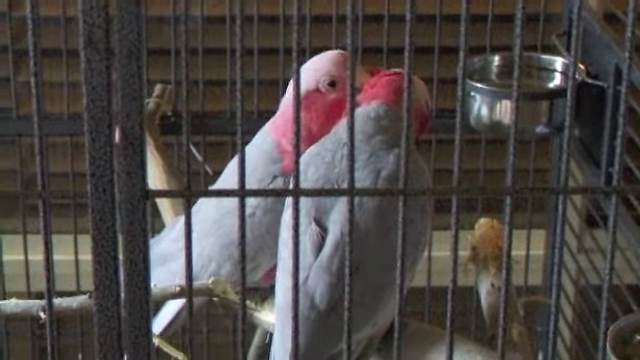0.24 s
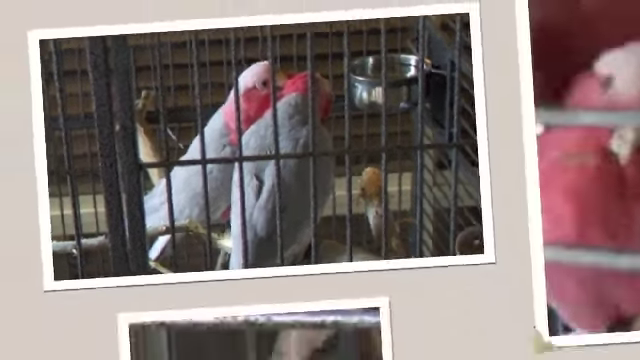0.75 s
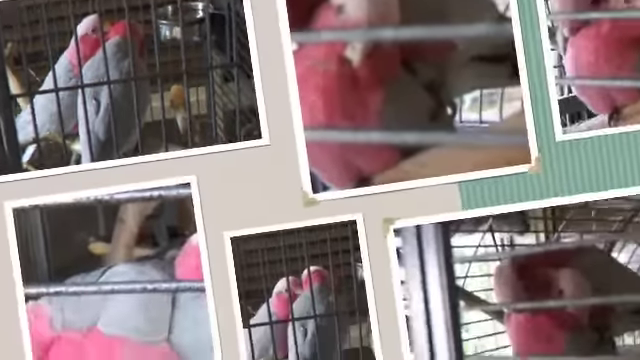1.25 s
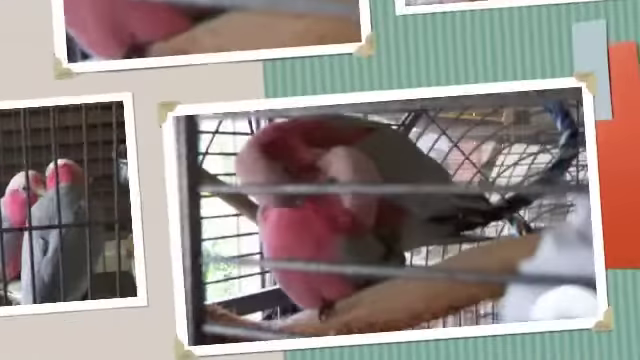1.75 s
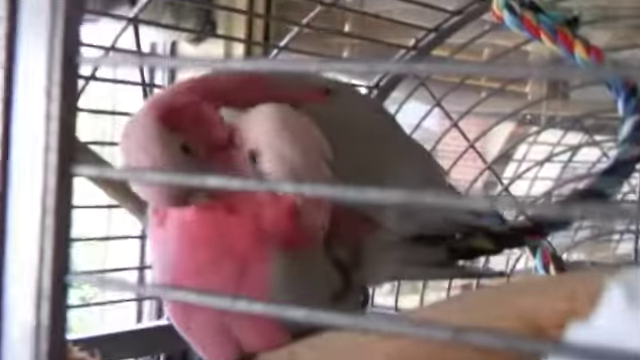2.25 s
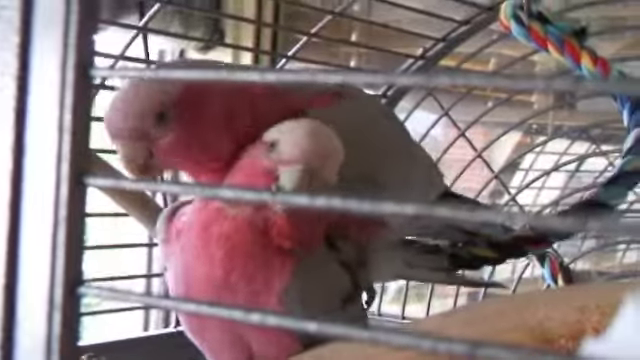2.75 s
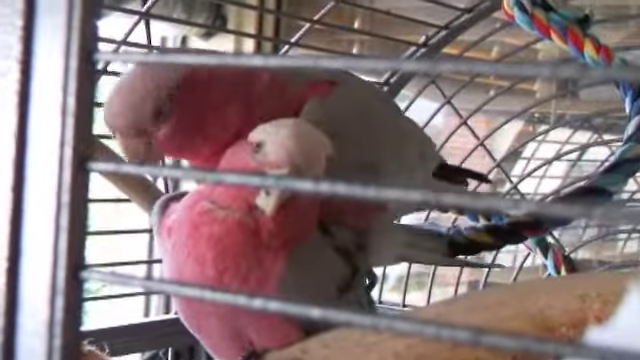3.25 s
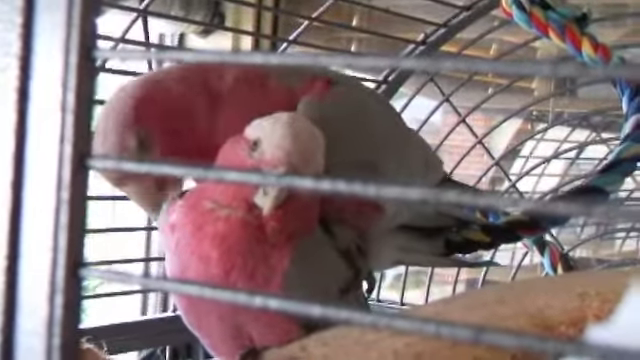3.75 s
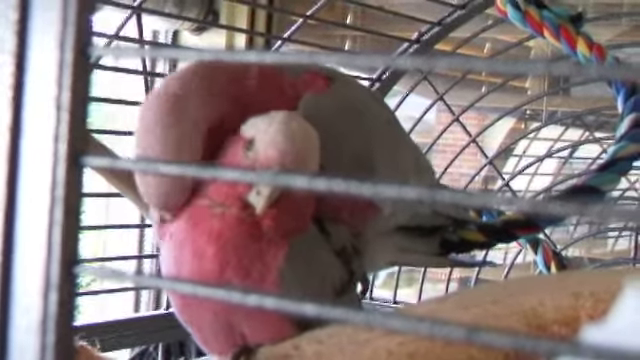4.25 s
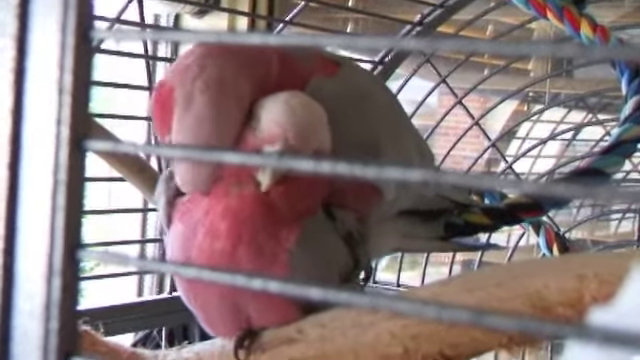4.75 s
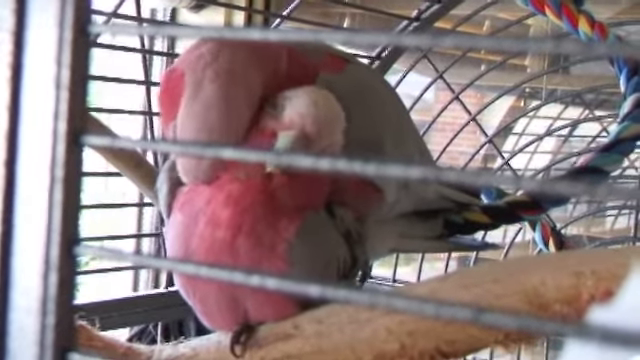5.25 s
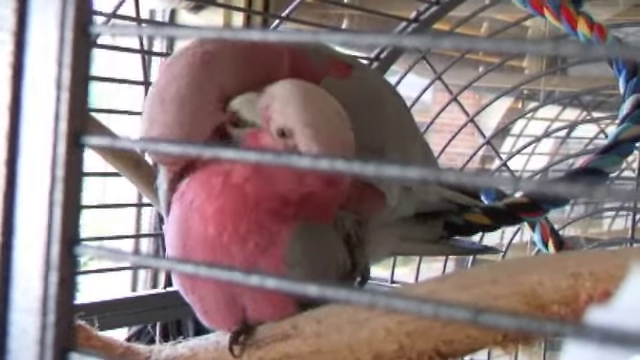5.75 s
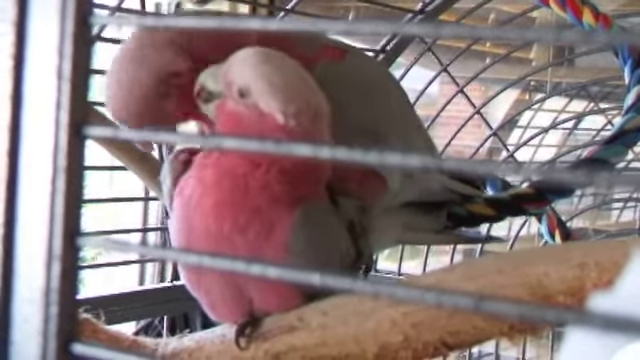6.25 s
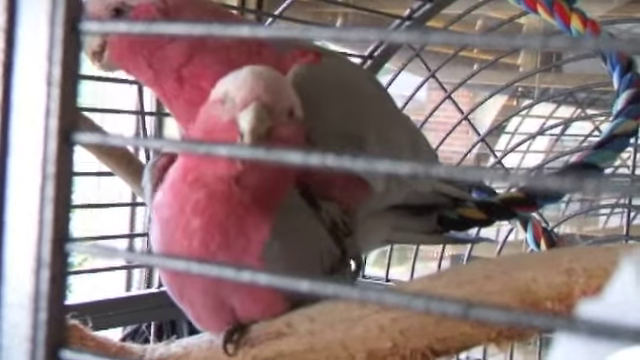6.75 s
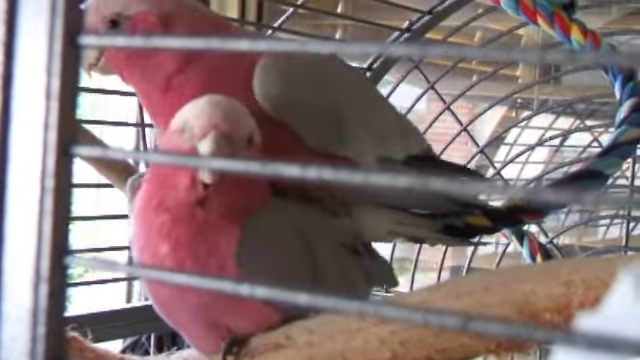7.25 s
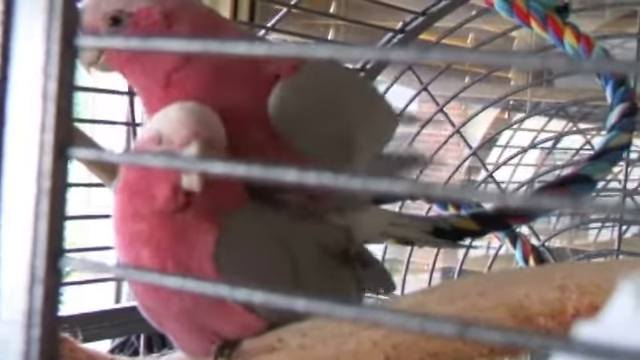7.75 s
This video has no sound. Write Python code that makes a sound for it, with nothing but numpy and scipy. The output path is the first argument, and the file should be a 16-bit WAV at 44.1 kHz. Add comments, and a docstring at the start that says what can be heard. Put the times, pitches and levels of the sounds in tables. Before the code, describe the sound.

Two cockatoos give short, squeaky, raspy calls in a cage, with light feather rustling and small clicks on the wire.

```python
"""An airy aviary, then a closer, more echoing room that fades in: two galahs squeak and preen in a cage.
One call sounds in the aviary and four in the room. Each comes from the syrinx, a bird's voice box:
a clear rising squeak, a rasping dip and a held whistle. In the room, birds hoot far off, feathers rustle,
beaks and claws knock on the wire, feet bump the perch and short pips sound. The air hums and hisses
softly, and an automatic volume control turns everything down during the loud calls."""
import sys
import numpy as np
from scipy import signal
from scipy.fft import rfft, irfft
from scipy.io import wavfile
from scipy.ndimage import uniform_filter1d

SR = 44100
rng = np.random.default_rng(int(sys.argv[2]) if len(sys.argv) > 2 else 0)


def master_out(mix):
    """Clip the mix to full scale and print it as 16-bit PCM to the path in sys.argv[1]."""
    frames = np.transpose(np.atleast_2d(mix))
    ceiling = np.clip(frames, -1, 1)
    pcm = np.round(ceiling * 32767).astype(np.int16)
    wavfile.write(sys.argv[1], SR, pcm)


N = 352800
TIME = np.arange(N) / SR
ROOM_START_S = 1.345


def from_db(db):
    """Turn decibels into a number to multiply a sound by."""
    return 10 ** (np.asarray(db) / 20)


def rms_one(x):
    """Scale a sound so that its average strength (rms) is 1."""
    return x / np.sqrt(np.mean(x ** 2) + 1e-20)


def at_hz(points, hz):
    """Read the gain at a frequency from a table of f/Hz, level/dB."""
    table_hz, db = np.transpose(points)
    return from_db(np.interp(np.log(hz + 1e-3), np.log(table_hz), db))


def colour(x, points):
    """Shape a sound's lows and highs by a table of f/Hz, level/dB; the result has strength 1."""
    hz = np.fft.rfftfreq(len(x), 1 / SR)
    return rms_one(irfft(rfft(x) * at_hz(points, hz), len(x)))


def flutter(size, low_hz, high_hz):
    """A random wobble between two rates, with strength 1."""
    band = signal.butter(2, [low_hz, high_hz], "band", fs=SR, output="sos")
    return rms_one(signal.sosfilt(band, rng.standard_normal(size + SR // 10))[-size:])


def bell(x, centre, width):
    """A smooth hump of height 1."""
    return np.exp(-((x - centre) / width) ** 2)


def add(track, s, sound):
    """Mix a sound into a track, starting at s seconds."""
    start = int(s * SR)
    track[start:start + len(sound)] += sound[:N - start]


def in_room(x, wet_db, t60):
    """Add echoes, wet_db above the direct sound, that fade 60 dB in t60 seconds; total energy is kept."""
    t = TIME[:SR * 2 // 3]
    echoes = rng.standard_normal(len(t)) * from_db(-60 * t / t60) * (t > .002)
    response = from_db(wet_db) * echoes / np.linalg.norm(echoes)
    response[0] = 1
    heard = signal.fftconvolve(x, response)
    return heard * np.linalg.norm(x) / np.linalg.norm(heard)


def aviary_air():
    """The aviary's steady background: a deep rumble under a soft hiss."""
    # tone of the background: f/Hz, level/dB
    air_tone = [(15, -49), (25, 1.5), (48, -7), (64, -10.5), (123, -2), (190, -7), (279, -5), (890, -5),
                (2450, -13), (2970, -13), (4270, -18.5), (5570, -16), (7260, -22.5), (8000, -42),
                (10400, -67), (17600, -120)]
    return from_db(-45) * colour(rng.standard_normal(N), air_tone)


def call_shape(squeak, rasp, whistle):
    """How the voice moves in one call: it arches up, falls into a rasp, climbs out and holds a whistle."""
    s, attack, rise, crest_hz, squeak_db, beak_db = squeak
    fall, climb, dip_hz, dip_db, dip_rough, climb_db, bend = rasp
    hold, top_hz, steady_hz, whistle_db, whistle_rough, whistle_bright_db = whistle
    dip, top, end = np.cumsum([rise + fall, climb, hold])
    rasping, clear = rise + 0.43 * fall, dip + 0.29 * climb   # when the rasp is full, and when it eases
    t = np.arange(0, end, 1 / SR)
    held_s = np.maximum(t - top, 0)
    catch = bell(t, top - .018, width=.012)   # the voice catches near the top of the climb

    arch = crest_hz * (.86 + .14 * np.sin(np.pi / 2 * t / rise))
    drop = crest_hz + (dip_hz - crest_hz) * np.clip((t - rise) / fall, 0, 1) ** 1.4   # gathers speed
    scoop = dip_hz + (top_hz - dip_hz) * np.clip((t - dip) / climb, 0, 1) ** bend
    settle = steady_hz + (top_hz - steady_hz) * np.exp(-held_s / .018)
    pitch = np.select([t < rise, t < dip, t < top], [arch, drop, scoop], settle)

    effort_db = np.interp(t, [attack, rasping, dip, clear, top],
                          [squeak_db, squeak_db - 5, dip_db, climb_db, whistle_db])
    fade_db = np.interp(t, [0, attack, end - 0.0099, end], [13, 0, 0, 18])
    level_db = effort_db - fade_db - 50 * held_s - 5 * catch   # the whistle sags 50 dB a second
    rough = np.interp(t, [rise, rasping, dip, clear, top],
                      [0.031, dip_rough, dip_rough, 0.22, whistle_rough])
    rough = np.clip(rough + 0.51 * catch, 0, 1)
    bright_db = np.interp(t, [dip, clear, top], [0, 5, whistle_bright_db])
    return s + t, pitch, level_db, rough, bright_db, beak_db * (t < dip)


def galah_call(call, shake, waver, upper_db, hiss_db, wet_db, t60):
    """The syrinx sings four harmonics; in a rasp, pitch and strength shake hundreds of times a second."""
    # how the throat and open beak colour the voice: f/Hz, level/dB
    throat = [(1500, -10), (2000, -5), (2600, 4), (3100, 3), (3600, -19.5), (4400, -3.5), (5200, 6.5),
              (6000, -6), (6600, 3.5), (7200, -9.5), (8500, -25.5)]
    beak_hz, beak_width_hz, rasp_depth = 5774, 480, .085
    t, pitch, level_db, rough, bright_db, beak_db = call_shape(*call)
    rasp = rasp_depth * rough ** 1.12 * flutter(len(t), 130, 660)
    shaken_pitch = pitch * (1 + rasp + waver * flutter(len(t), 25, 140))
    phase = 2 * np.pi * np.cumsum(shaken_pitch) / SR
    tremble = np.exp(shake * rough * flutter(len(t), 110, 400) - (shake * rough) ** 2)
    soft_ends = np.clip(np.minimum(t - t[0], t[-1] - t) / 0.00091, 0, 1)
    strength = from_db(level_db) * tremble * soft_ends
    harmonics = np.arange(1, 5)[:, None]   # tones at 1, 2, 3 and 4 times the pitch
    tilt_db = bright_db * np.log2(np.minimum(harmonics, 2)) + upper_db * np.maximum(harmonics - 2, 0)
    beak_ring_db = beak_db * bell(harmonics * pitch, beak_hz, beak_width_hz)
    weights = at_hz(throat, harmonics * pitch) * from_db(tilt_db + beak_ring_db)
    tones = np.sqrt(2) * strength * weights / np.linalg.norm(weights, axis=0) * np.sin(harmonics * phase)
    # at its roughest the membrane of the syrinx rattles into noise
    hiss = from_db(hiss_db) * strength * rough * colour(flutter(len(t), 1900, 6600), throat)
    out = np.zeros(N)
    add(out, t[0], sum(in_room(part, wet_db, t60) for part in [*tones, hiss]))
    return out


def room_air():
    """The room's steady background: a low hum of noise under a soft hiss."""
    # tone of the background: f/Hz, level/dB
    air_tone = [(15, -45.5), (25, -19), (64, 3), (117, -8.5), (286, -6.5), (373, -6.5), (453, -6),
                (808, -4), (890, -5), (1410, -9.5), (1590, -10.5), (2510, -13.5), (4820, -15), (6760, -13),
                (8000, -34.5), (10400, -66), (17600, -120)]
    return from_db(-47.5) * colour(rng.standard_normal(N), air_tone)


def distant_notes():
    """Distant birds hoot and whistle, and a faint insect shrills a thin high note; each is a nearly pure note
    whose pitch follows a curve."""
    # soft notes: t/s, length/s, start f/Hz, middle f/Hz, end f/Hz, level/dB
    far_notes = [(1.507, .1, 7000, 6920, 7000, -51), (2.675, 0.23, 766, 806, 707, -49),
                 (3.477, .135, 1960, 2430, 1810, -38.5), (4.040, 0.15, 736, 738, 630, -48),
                 (6.760, 0.15, 769, 810, 697, -50), (7.420, 0.16, 763, 700, 586, -49.5)]
    out = np.zeros(N)
    for s, length, start_hz, middle_hz, end_hz, db in far_notes:
        progress = np.linspace(0, 1, int(length * SR))
        curve = np.polyfit([0, .5, 1], [start_hz, middle_hz, end_hz], 2)
        pitch = np.polyval(curve, progress) * (1 + 0.023 * flutter(len(progress), 13, 150))
        note = np.sin(2 * np.pi * np.cumsum(pitch) / SR) * np.sqrt(progress * (1 - progress))
        add(out, s, in_room(from_db(db) * rms_one(note), wet_db=-4.0, t60=0.37))
    return out


def feather_rustle(ticks_per_s, spread_db, attack_s):
    """Feather barbs slip past each other in tiny ticks; each stroke swells quickly and dies away."""
    # feathers drawn through a beak or shaken: t/s, level/dB, time to fade by 60 dB/s
    strokes = [(2.021, -44.5, 1.4), (2.34, -47.5, 2.5), (2.56, -38.5, 0.34), (2.62, -36.5, 0.52),
               (2.735, -41.5, .6), (2.92, -43, 0.04), (5.78, -42.5, 1), (5.97, -31, 1.44),
               (6.028, -35, 0.76), (6.58, -47.5, 0.3), (6.79, -41.5, 3), (6.872, -30.5, .3),
               (6.97, -29.5, 0.67), (7.13, -49, 1.5), (7.46, -46, 0.7)]
    # tone of the rustle: f/Hz, level/dB
    feather_tone = [(290, -24), (500, -9.5), (733, -3.5), (1190, -9), (1810, -6.5), (2480, -9),
                    (2690, -5.5), (5150, -7), (6490, -2.5), (7210, -10), (8000, -30), (10400, -50),
                    (17600, -120)]
    power, t = np.zeros(N), TIME[:SR]
    for s, db, t60 in strokes:
        swell = np.minimum(t / attack_s, 1)
        fade = from_db(db - 60 * np.maximum(t - attack_s, 0) / t60)
        add(power, s, (swell * fade) ** 2)
    sizes = from_db(spread_db * np.minimum(rng.exponential(1, N), 4)) * rng.standard_normal(N)
    ticks = colour(sizes * (rng.random(N) < ticks_per_s / SR), feather_tone)
    return in_room(ticks * np.sqrt(power), wet_db=-5.5, t60=0.27)[:N]


def cage_knocks(click_db, gain_db):
    """A beak or claw clicks and scrapes on the wire; each touch rings the cage's tones in its own mix."""
    # touches: t/s, relative level/dB, body/dB, treble/dB, scrape fade time/s
    touches = [(2.207, -38.5, 7, -15, 0.023), (2.294, -34.5, -3, -2.5, 0.018),
               (2.522, -35.5, -4, 0.5, .015), (3.449, -26, 3, -12, 0.017), (3.517, -34, 15.5, 3, 0.047),
               (4.347, -32, -8, -7, 0.0048), (4.441, -20, -2.5, -6.5, .0026),
               (4.585, -39.5, -8, -26, 0.0014), (4.655, -39.5, 6, -13, .002), (4.704, -39, -3, -5, 0.0071),
               (5.285, -34, 9, -17, 0.012), (5.631, -29, 6.5, -8.5, 0.021), (5.677, -33, 0, -10, 0.012),
               (5.967, -20, 1.5, -11, 0.011), (6.446, -24, -4.5, -2.5, 0.011),
               (6.749, -36.5, 5, -2.5, 0.0093), (7.336, -27.5, -8.5, -16, 0.0041),
               (7.425, -37, -5, -5, 0.024), (7.513, -35.5, -6, -5.5, 0.0046)]
    # tones the cage rings with: f/Hz, width/Hz, level/dB
    cage_tones = [(706.5, 64, 5.5), (816, 109, 3), (1056, 89, -3), (1256, 100, -1.5), (1500, 240, -4),
                  (1877, 120, 3.5), (2042, 71, 6), (2128, 152, 2.5), (2917, 226, -2.5), (4300, 480, -1.5),
                  (5300, 500, 0.5), (6040, 360, 0.5), (7210, 340, -7)]
    out, t = np.zeros(N), TIME[:SR // 5]
    for s, level_db, body_db, treble_db, scrape_s in touches:
        force = rng.standard_normal(len(t)) * np.exp(-t / max(scrape_s, .001))
        force[0] += from_db(click_db) * np.linalg.norm(force)
        touch_tone = [(900, body_db), (1900, 0.004), (2800, 0.0022), (4800, treble_db)]   # f/Hz, level/dB
        knock = 0
        for k, (hz, width_hz, db) in enumerate(cage_tones):
            r = np.exp(-np.pi * width_hz / SR)   # share of the ringing left after one sample
            ring = signal.lfilter([1, 0, -1], [1, -2 * r * np.cos(2 * np.pi * hz / SR), r * r], force)
            knock += (-1) ** k * (1 - r * r) * from_db(db) * at_hz(touch_tone, hz) * ring
        add(out, s, in_room(from_db(level_db + gain_db) * rms_one(knock), wet_db=3.5, t60=0.3))
    return out


def perch_bumps():
    """A shifting foot shakes the perch; a longer push gives a purer hum."""
    # dull bumps: t/s, f/Hz, level/dB, length/s
    pushes = [(2.215, 170.7, -52, 0.031), (2.285, 134, -43, 0.057), (2.340, 125, -49, 0.036),
              (2.486, 131, -53.5, 0.053), (6.030, 216, -54, 0.18)]
    out = np.zeros(N)
    for s, hz, db, length in pushes:
        progress = np.linspace(0, 1, int(length * SR))
        spread = 1 + 3.5 / (hz * length)
        hum = flutter(len(progress), hz / spread, hz * spread) * np.sqrt(progress) * (1 - progress)
        add(out, s, in_room(from_db(db) * rms_one(hum), wet_db=-1.5, t60=0.51))
    return out


def high_pips(length_s):
    """Very short, high tones that wobble slightly."""
    # pips: t/s, f/Hz, level/dB
    pip_notes = [(3.440, 3080, -32), (3.441, 4070, -41), (3.691, 3034, -38), (3.696, 4160, -48),
                 (3.815, 4800, -53), (4.015, 4820, -53), (4.182, 4900, -55), (5.483, 4760, -49),
                 (5.582, 4740, -52), (6.65, 4850, -50)]
    out, t = np.zeros(N), TIME[:int(length_s * SR)]
    for s, hz, db in pip_notes:
        pip = np.sin(2 * np.pi * hz * t + 0.41 * flutter(len(t), 60, 305)) * np.hanning(len(t))
        add(out, s, in_room(from_db(db) * rms_one(pip), wet_db=-1.5, t60=0.21))
    return out


def volume_control(x, threshold_db, share, release_db_per_s, attack_s):
    """Loud sounds pull the volume down quickly; it creeps back afterwards."""
    level_db = 10 * np.log10(np.maximum(uniform_filter1d(x ** 2, SR // 250), 1e-12))
    wanted_db = share * np.maximum(level_db - threshold_db, 0)
    creep = release_db_per_s * TIME
    down_db = np.maximum.accumulate(wanted_db + creep) - creep
    r = np.exp(-1 / (attack_s * SR))
    return x * from_db(-signal.lfilter([1 - r], [1, -r], down_db))


def scene():
    """One call in the aviary, then a sudden switch to the room with all the other sounds."""
    # each call's opening squeak: t/s, attack/s, rise/s, crest f/Hz, level/dB, ring of the open beak/dB
    squeaks = [(1.148, 0.021, .028, 2616, -25.5, -2), (1.635, 0.036, 0.04, 3249, -8, 13),
               (3.057, 0.0091, .028, 3163, -8.5, 19), (4.998, 0.012, 0.028, 2908, -9, 13.5),
               (7.601, 0.011, .025, 3010, -5.5, 18.5)]
    # its rasp: fall/s, climb/s, dip f/Hz, dip level/dB, roughness 0-1, climb level/dB, bend (1 = straight)
    rasps = [(.056, .034, 1660, -30.5, 0.5, -24.5, 0.91), (.048, .054, 2050, -25, 0.4, -15, 1),
             (.046, .078, 1900, -28.5, 0.3, -14.5, .55), (.042, .094, 1950, -26.5, 0.67, -19, 1.4),
             (.046, .068, 2100, -21, 0.59, -13, .8)]
    # its whistle: hold/s, start f/Hz, steady f/Hz, level/dB, roughness 0-1, brightness/dB
    whistles = [(0.041, 1930, 2000, -26.5, 0.28, -3.5), (0.116, 2690, 2610, -15, 0.18, 3),
                (0.058, 2595, 2580, -9.5, 0.03, 0.5), (0.023, 2440, 2350, -16, 0.24, 2.5),
                (0.056, 2430, 2295, -14.5, 0.13, -2)]
    first_call, *later_calls = zip(squeaks, rasps, whistles)
    aviary = galah_call(first_call, shake=0.22, waver=0.019, upper_db=-11.5, hiss_db=-21,
                        wet_db=4.5, t60=0.34)
    aviary += aviary_air()
    room = sum(galah_call(call, shake=0.44, waver=0.0012, upper_db=-6, hiss_db=-3, wet_db=3.5, t60=0.36)
               for call in later_calls)
    room += cage_knocks(click_db=-9.5, gain_db=-11.5) + perch_bumps()
    room += feather_rustle(ticks_per_s=9000, spread_db=1.5, attack_s=0.018)
    room += distant_notes() + high_pips(length_s=.014) + room_air()
    return np.where(TIME < ROOM_START_S, aviary, room)[None]


def record(dry):
    """Turn loud sounds down, fade the room in and remove the highest treble."""
    fade_in_s, cutoff_hz = 0.81, 7900
    levelled = volume_control(dry[0], threshold_db=-24, share=.55, release_db_per_s=22, attack_s=.005)
    fade_in = np.interp(TIME - ROOM_START_S, [0, fade_in_s], [from_db(-33), 1], left=1)
    treble_cut = signal.ellip(10, .1, 70, cutoff_hz, fs=SR, output="sos")
    return signal.sosfilt(treble_cut, levelled * fade_in)[None]


dry = scene()
out = record(dry)
master_out(out)
```